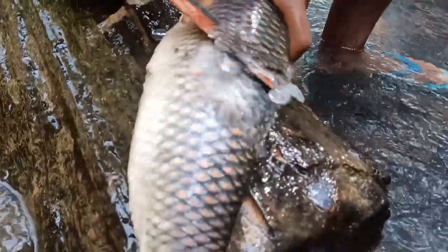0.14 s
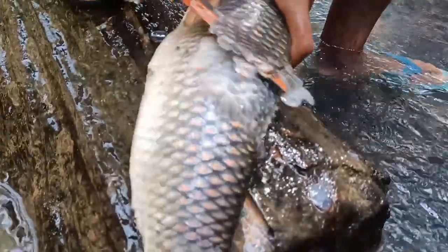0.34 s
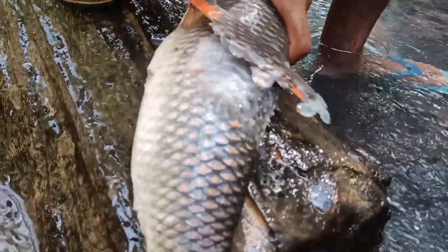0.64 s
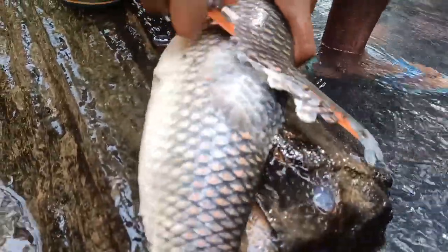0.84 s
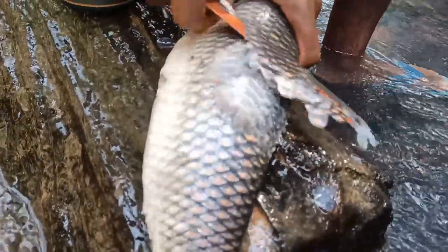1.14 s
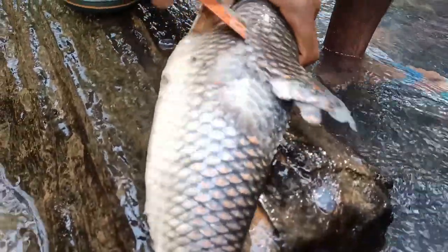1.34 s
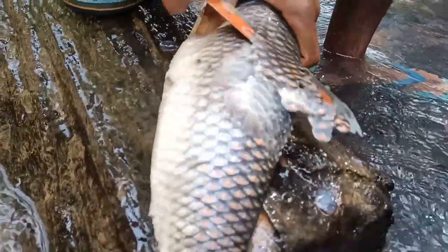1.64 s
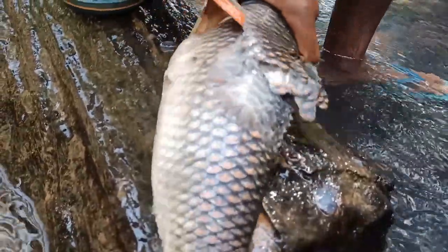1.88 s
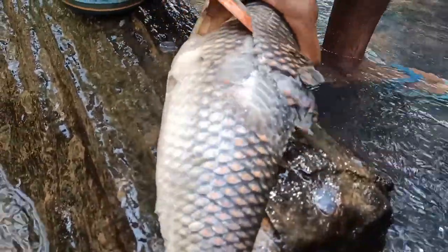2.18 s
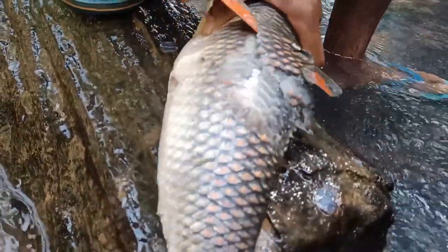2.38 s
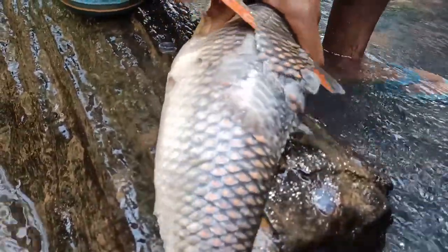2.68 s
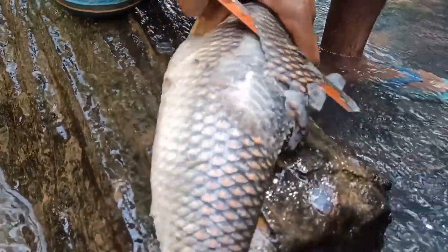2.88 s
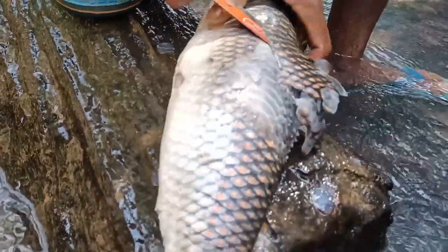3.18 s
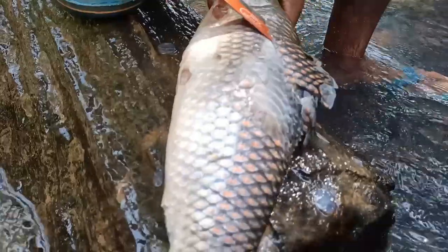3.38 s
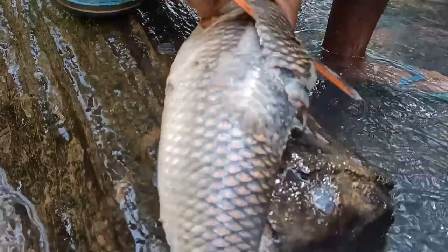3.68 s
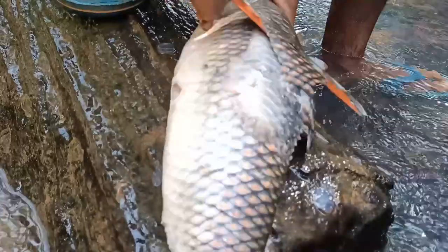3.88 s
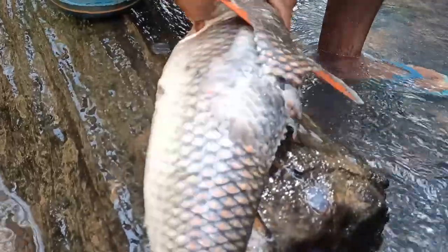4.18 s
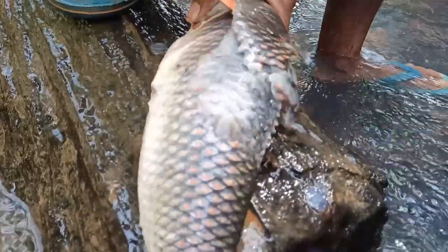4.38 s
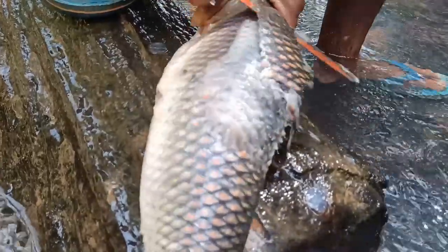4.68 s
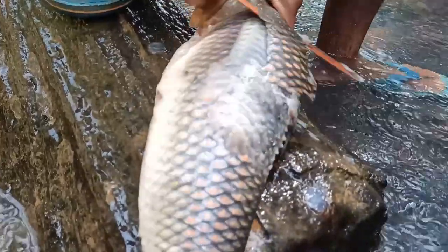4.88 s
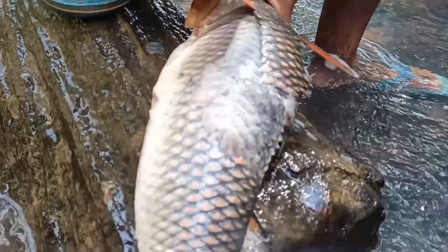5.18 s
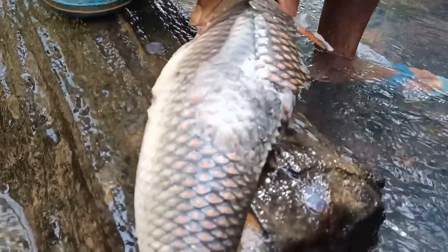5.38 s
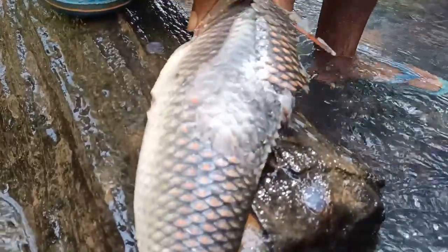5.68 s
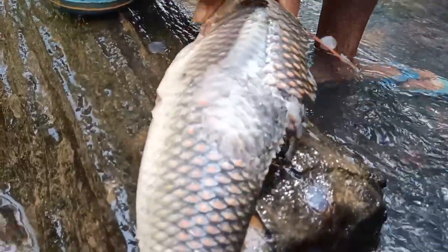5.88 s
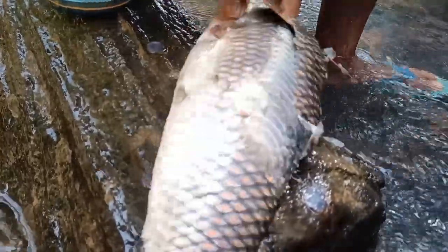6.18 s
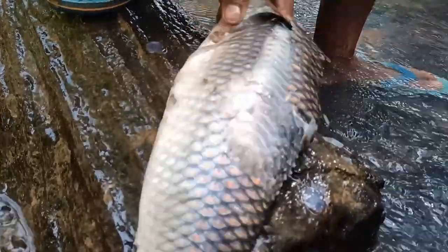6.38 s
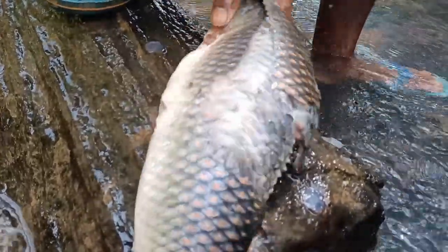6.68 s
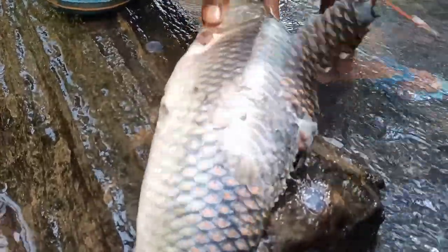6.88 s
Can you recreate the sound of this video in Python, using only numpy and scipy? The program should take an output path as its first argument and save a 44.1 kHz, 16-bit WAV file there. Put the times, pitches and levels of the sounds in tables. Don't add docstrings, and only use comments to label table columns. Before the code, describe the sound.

Very close, bright scraping: a blade saws beneath the scales of a big fish, strong push and softer return about three times a second. Sharp snaps pop out of the gritty rasp. After a short lull midway the strokes resume, weaker, swell again, then die away to a last tick. A shallow stream murmurs faintly outdoors, with a distant frog and a faint cricket.

```python
import sys
import numpy as np
from scipy import signal
from scipy.fft import rfft, irfft, next_fast_len
from scipy.io import wavfile
from scipy.ndimage import uniform_filter1d, map_coordinates

SR = 44100
rng = np.random.default_rng(int(sys.argv[2]) if len(sys.argv) > 2 else 0)


def voltage_ratio(decibels):
    exponent = np.asarray(decibels, float) / 20
    return 10 ** exponent


def materialize(psi):
    bounded = np.clip(np.atleast_2d(psi).T, -1, 1)
    quanta = np.round(bounded * 32767).astype(np.int16)
    wavfile.write(sys.argv[1], SR, quanta)


N = 310464

# [t/s, length/s, peak level/dB, peak place 0-1, blade slant/dB (flat is duller)]
PUSHES = [(0.205, 0.1, -20.5, 0.51, 5), (.504, 0.087, -24.5, 0.76, -4), (0.804, 0.09, -21, 0.22, -2.5),
          (1.099, 0.097, -22, 0.68, -1.5), (1.389, 0.1, -23.5, 0.39, 2.5), (1.684, 0.096, -21, 0.33, -1.5),
          (1.973, 0.1, -23, 0.41, 7.5), (2.264, 0.095, -22, 0.47, 0.5), (2.548, 0.1, -19.5, 0.51, 1.5),
          (2.839, 0.099, -29, 0.45, 4.5), (3.54, 0.13, -35, 0.38, 14.5), (3.873, 0.076, -32.5, 0.31, 10),
          (4.155, 0.092, -30.5, 0.25, -0.5), (4.448, 0.11, -22.5, 0.69, -3),
          (4.596, 0.075, -20.5, 0.61, -8), (4.87, 0.093, -24.5, 0.57, -8.5), (5.165, 0.11, -30, 0.22, -5.5),
          (5.467, 0.11, -28, 0.54, -7), (5.782, 0.098, -31.5, 0.63, -1), (6.121, 0.085, -39, 0.81, 12)]
# [t/s, length/s, peak level/dB, peak place 0-1, blade slant/dB]
PULLS = [(0.037, 0.12, -31, 0.6, -10.5), (0.324, 0.13, -32.5, 0.76, -5.5), (0.642, 0.11, -29.5, 0.76, 3.5),
         (0.921, 0.12, -27, 0.74, 3), (1.224, 0.12, -27, 0.81, -0.5), (1.518, 0.12, -28.5, 0.74, 0),
         (1.799, 0.12, -30, 0.77, -4.5), (2.087, 0.13, -31.5, 0.61, -1), (2.364, 0.14, -36, 0.77, -2),
         (2.668, 0.13, -27.0, 0.79, -6.5), (2.976, 0.1, -27.5, 0.84, -5.5), (3.693, 0.13, -35, 0.78, 0.5),
         (3.969, 0.13, -37.5, 0.77, -3), (4.276, 0.13, -37, 0.45, -5), (4.697, 0.12, -29, 0.71, -10),
         (4.98, 0.14, -33.5, 0.75, -7), (5.282, 0.15, -34, 0.71, -2), (5.622, 0.12, -37, 0.51, 0),
         (5.9, 0.13, -35, 0.5, -1), (6.215, 0.15, -37, 0.5, 1), (6.381, 0.18, -45.5, 0.6, 2.5)]
# [t/s, length/s, peak level/dB, peak place 0-1, blade slant/dB]
TOUCHES = [
    (0.0, 0.018, -26, 0.25, -3),
    (3.1, 0.039, -42.5, 0.11, -19),
    (3.15, 0.087, -42, 0.23, -1),
    (3.402, 0.088, -53, 0.62, 8),
    (6.585, 0.145, -54, 0.41, -17),
    (6.668, 0.024, -37, 0.33, 12),
    (6.75, 0.2, -65, 0.81, 23),
]
# [rise/dB, rise exponent, fall/dB, fall exponent]
SWELLS = [
    (16.2, 1.51, 10, 1.5),
    (25.2, 2.1, 10, 1.53),
    (7.94, 0.24, 10.5, 0.59),
]
# [thump/dB, skin drag/dB, bite/dB, rasp/dB, sizzle/dB]
COLOURS = [
    (-42.5, -25.5, -22, -2.5, -10.5),
    (-43.5, -27, -20, 3, -10),
    (-28.5, -20, -16, 5.5, -9),
]
LEADS = (0.012, 0.0052, .01)
PER_SLANT = (0.6, 0.7, 0.8, 0.8, 0.4)
OVER_BELLY = (13, -5.5, 11, -5, 5.5)
DRY_SCALES = (4, -1.5, -0.9, 3.6, 7.5)
# [t/s, over the belly 0-1, scale stiffness (under 0 is bare wet skin), extra scatter]
CUT = [(0.0, 0.68, 0, 0.7), (0.9, 0.68, 0.5, 0), (1.7, 0.66, -0.34, 0), (2.5, 0.59, -0.22, 0.76),
       (3.2, 0.67, -0.36, 0.65), (3.599, 0, 0.1, 0.95), (4.0, 0.48, 0.15, 0.55), (4.25, 0.23, -1.3, 0.57),
       (4.651, 0.49, -0.5, 0.15), (5.4, 0.46, -0.1, 0.88), (5.9, 0.54, 0.55, 0.3), (6.3, 0.6, 1.58, 0.88),
       (6.679, 0.54, 0.8, 0.7), (6.831, 0.9, -7.5, 0.5)]
# [f/Hz, level/dB]
USUAL_GRIP = [(600, -35), (1300, -30), (2200, -12), (3200, -12), (4100, -8), (5000, -8), (6500, 0),
              (11000, -6)]
# [f/Hz, density/dB per Hz]
SCALES = [(59, -51), (100, -31.5), (467, -28.5), (589, -22.5), (742, -28), (917, -24.5), (1340, -20.5),
          (1690, -21), (2930, -4), (3930, -6), (6530, -5), (9740, -5.5), (11100, -4.5), (14500, -11),
          (15500, -5)]
# [f/Hz, width/Hz, level/dB]
BELLY = (592, 120, 5.6)
# [f/Hz, level/dB added left and taken right]
PORTS = [(300, -2.5), (1200, 1), (2500, -0.25), (12000, 0.018)]
# [t/s, peak level/dB, fade/s]
CATCHES = [(0.0483, -26, 0.012), (0.0752, -9, 0.0098), (0.2174, -6.5, 0.013), (0.2404, -27, 0.012),
           (0.3451, -29, 0.012), (0.5551, -19, 0.012), (0.5866, -5.5, 0.011), (0.6559, -25, 0.013),
           (0.7188, -13, 0.01), (0.8106, -22, 0.012), (0.8255, -7, 0.01), (0.9303, -27, 0.012),
           (1.1039, -32, 0.011), (1.2406, -25, 0.013), (1.4007, -17, 0.012), (1.4192, -11, 0.012),
           (1.6975, -23, 0.012), (1.7114, -4, 0.025), (1.8352, -30, 0.013), (1.9844, -30, 0.012),
           (2.2623, -23, 0.012), (2.2892, -7, 0.012), (2.4119, -24, 0.01), (2.5591, -12, 0.012),
           (2.5714, -18, 0.012), (2.7157, -33, 0.012), (2.8684, -6.5, 0.025), (3.0165, -13, 0.011),
           (3.5613, -22, 0.013), (3.8811, -32, 0.012), (3.9923, -18, 0.013), (4.0597, -26, 0.012),
           (4.1699, -14, 0.016), (4.3124, -28, 0.011), (4.4503, -13, 0.014), (4.5121, -3.5, 0.011),
           (4.6074, -3.5, 0.013), (4.7451, -11, 0.016), (4.8788, -22, 0.012), (5.0135, -23, 0.0089),
           (5.1866, -28, 0.011), (5.4979, -18, 0.012), (5.6401, -19, 0.012), (5.8064, -29, 0.012),
           (6.1474, -25, 0.021), (6.2372, -24, 0.012), (6.2811, -22, 0.01), (6.3051, -8, 0.01),
           (6.6762, -20.5, 0.012)]
# [f/Hz, left lag upright/rad, leaning/rad, turned/rad, shading of scatter/dB]
POSES = [(0, 0, 0, 0, -3), (1200, 1.2, .5, .4, -3), (1900, 2.2, 1.3, 2.2, 0), (2900, 1.6, .6, 3.1, 0),
         (3800, 3.3, 2.5, 5.6, -12), (5300, 4.6, 3.4, 9.4, -1), (6800, 7.1, 6.3, 12.8, 0),
         (8500, 9.3, 7.2, 14, 0), (11700, 10.6, 7.9, 14.4, -1), (22050, 16, 13, 19, 0)]
# [t/s, pose 0-2]
TURNING = [(0, 0), (.8, 0), (1.5, 1), (3.8, 1), (3.81, 2), (5.2, 2), (5.21, 1), (6, .9), (6.2, 1.1)]
# [t/s, left-right level/dB, left lag of a snap/samples]
PLACE = [(0, -3, 7), (1, -1.5, 6.23), (3, -1, 3.7), (3.1, -2, 3.1), (3.6, 1, 1.6), (3.7, 0, 10.2),
         (4.3, 1.5, 13.4), (4.6, -1, 9.7), (5, 0.5, 10), (5.25, 0, 19), (5.3, -1.5, 3.9), (5.6, -2.5, 7.1),
         (6.2, 0, 3.2), (6.3, -0.5, 6.3), (7.04, 0, 5.3)]
# [t/s, level/dB, left-right level/dB, ring f/Hz]
CRACKS = [(.0766, -14.5, -4, 5940), (.219, -10, -4, 7920), (.5879, -11.5, -1, 4480),
          (.7202, -15.5, -5, 5340), (.8801, -13, -6, 10680), (1.2832, -15.5, -3, 8790),
          (1.8362, -21.5, 3, 5080), (1.9859, -18.5, -7, 6720), (2.0648, -15, -4, 6550),
          (2.3118, -8, -4, 5430), (2.4129, -20, -4, 4910), (2.5765, -9, -4, 5770),
          (3.0799, -22.5, -7, 6030), (3.0983, -12.5, 3, 7800), (3.7197, -21.5, 7, 4740),
          (.2913, -11.5, -3, 3880), (1.4205, -12, -7, 5600), (2.2902, -10.5, -5, 5770),
          (4.171, -14.5, 1, 5770), (4.5149, -8.5, 5, 5940), (4.6085, -8, -3, 8440), (5.0146, -17, 4, 5600),
          (5.0785, -15.5, -1, 5430), (6.3066, -14.5, 0, 6770), (6.6776, -21, 2, 7400),
          (4.0613, -23, 2, 4400), (.5615, -14, -4, 7200), (.2413, -9, -4, 6500)]
# [t/s, level/dB, left-right level/dB, ring f/Hz]
TICKS = [(.0268, -33, 4, 5770), (.0496, -27, -2, 6980), (.1839, -32, -9, 5250), (.6276, -25, -4, 4480),
         (.6573, -27, -6, 6720), (.7948, -28, -4, 8870), (1.2419, -25, 2, 4820), (1.7987, -28.5, -5, 4130),
         (2.1002, -33, -3, 5600), (2.6702, -31, -8, 6720), (3.1019, -26, -2, 8530), (3.2611, -32, 1, 5080),
         (.3375, -36, -4, 8000), (.3420, -35, -4, 7000), (3.998, -28, 4, 4700), (3.9511, -28, 6, 4390),
         (4.1557, -25, 2, 5600), (4.4153, -38.5, -1, 6030), (4.9767, -26, 10, 5680),
         (4.9922, -32.5, -7, 11800), (4.9981, -30.5, 3, 5340), (5.4375, -32.5, -1, 4390),
         (5.6204, -41.5, -1, 6890), (6.168, -27.5, -1, 11630), (6.4935, -33, -4, 8700),
         (6.6013, -46, -8, 11370), (6.6312, -42, -9, 8870)]
# [t/s, level/dB, left-right level/dB, ring f/Hz]
SLAPS = [
    (1.5349, -29, 0, 3620),
    (3.7947, -15, -2, 5000),
    (3.8046, -14.5, 9, 4910),
    (3.9936, -22, 5, 4700),
    (4.2485, -19, 2, 4740),
    (4.5908, -18, 6, 5250),
    (4.596, -17, 0, 5680),
    (6.0837, -37, 0, 5000),
    (6.6774, -24, 1, 4660),
]
KNOCKS = (-49.5, -39, -13.5)
# [t/s, rise/s, level/dB]
LIFT_OFF = (6.845, 0.022, -64)
# [f/Hz, width/Hz, level/dB]
LIFT_BANDS = [(4250, 500, 0), (5000, 900, -5), (5850, 700, -2), (7300, 400, -12)]
# [f/Hz, T60/s]
ROCKS = [(500, 0.017), (3000, 0.12), (12000, 0.0039)]
# [t/s, blade resting on skin level/dB, stream level/dB]
REST = [(0.0, -39.5, -70.5), (2.92, -41, -70.5), (3.369, -53, -73), (3.92, -37.5, -71), (4.88, -39, -71),
        (6.821, -53.5, -74), (7.04, -51, -71)]
# [f/Hz, density/dB per Hz]
STREAM = [(12, -43.5), (20, -10.5), (140, -13), (219, -16), (382, -14), (478, -15.5), (788, -19),
          (881, -23.5), (1010, -19.5), (1300, -24), (6360, -24.5), (7950, -51.5), (15500, -49.5)]
# [f/Hz, coherence 0-1]
COHERENCE = [(60, 0.018), (300, 0.53), (700, 0.16), (1500, 0.15)]
# [t/s, f/Hz, length/s, level/dB]
GURGLES = [(0.054, 1010, 0.025, -59), (0.587, 564, 0.021, -54.5), (1.715, 590, 0.018, -53.5),
           (1.875, 587, 0.056, -62), (2.151, 594, 0.048, -53), (3.467, 690, 0.0067, -61),
           (3.861, 666, 0.0266, -61.5), (3.998, 510, 0.041, -59), (4.247, 676, 0.0017, -42),
           (4.518, 38.2, 0.22, -67.5), (4.906, 50, 0.052, -74.5), (6.215, 1910, 0.03, -65),
           (6.677, 715, 0.0024, -46), (6.678, 261, 0.003, -47), (6.9, 1170, 0.023, -65)]
# [t/s, first f/Hz, last f/Hz, level/dB, hoarseness 0-1]
FROG = [
    (0.605, 990, 1060, -56.5, 0.7),
    (0.57, 1250, 1100, -54, 0.8),
    (2.04, 990, 1060, -56, 0.77),
    (2.035, 1200, 1130, -55, 0.8),
    (3.278, 1010, 1080, -56, 0.31),
    (4.801, 1020, 1110, -55, 0),
    (6.164, 1000, 1060, -58.5, 0.5),
]
# [t/s, length/s, level/dB]
CROAK = [
    (0.004, 0.022, -13.5),
    (0.035, 0.028, -12),
    (0.077, 0.031, -9.5),
    (0.115, 0.031, -2.5),
    (.146, .048, -8.5),
    (0.195, 0.017, -16),
]
# [t/s, f/Hz, level/dB]
CRICKET = [(3.249, 7600, -68), (4.09, 8000, -64.5), (6.062, 8050, -65), (6.395, 8000, -60),
           (6.73, 8100, -66), (6.89, 7500, -81), (6.975, 8040, -67)]


def blade_contact():
    edge, left, right = (crackle(rate=3000, spread_db=5, turns=1.3, hiss=0.65, burst=0.3) for _ in range(3))
    return edge, np.array([left, right])


def crackle(rate, spread_db, turns, hiss, burst):
    at, pitch, luck, phase = rng.random((4, int(rate * N / SR)))[..., None]
    hz = 1500 + 15000 * pitch
    t = np.arange(48) / SR
    size = np.sqrt(hz) * voltage_ratio(-spread_db * np.log(luck + 1 / 20))
    rings = size * np.cos(2 * np.pi * (hz * t + phase)) * np.exp(-t * hz / turns)
    places = (at * N).astype(int) + np.arange(len(t))
    grains = np.bincount(places.ravel(), rings.ravel(), N + len(t))[:N]
    rows = (rng.random(N) < 70 / SR) * rng.random(N)
    rattle = signal.fftconvolve(rows, np.exp(-np.arange(900) / (0.0097 * SR)))[:N]
    clumps = (1 + burst * rattle) * voltage_ratio(1.3 * wobble(N, 300))
    depth_db = 4 * np.clip(np.arange(129) / 16, 0.3, 1)[:, None]
    friction = clumps * (unit(grains) + hiss * rng.standard_normal(N))
    return unit(patched(friction, depth_db, bins=2, frames=22))


def strokes(contact, scattered):
    out = np.zeros((2, N))
    usual_hz, usual_db = np.transpose(USUAL_GRIP)
    cut_s, *cut = np.transpose(CUT)
    tremble_db, caught = 0.13 * wobble(N, 700), catches()
    tail = 0.026
    kinds = zip([PUSHES, PULLS, TOUCHES], SWELLS, COLOURS, [-1, 1, 0], LEADS)
    for rows, shape, colour, lean, lead in kinds:
        for s, length, peak_db, peak_at, slant_db in rows:
            first = max(round((s - lead) * SR), 0)
            span = slice(first, round((s + length + tail) * SR))
            soft, dry, extra = (np.interp(s, cut_s, column) for column in cut)
            share = np.clip(0.37 * (1 + extra + lean * 0.17), 0.05, 0.8)
            change_db = np.dot([slant_db, soft, dry], [PER_SLANT, OVER_BELLY, DRY_SCALES])
            thump, drag, bite, rasp, sizzle = np.array(colour) + change_db
            grip_db = np.array([thump, drag, bite, bite, rasp, rasp, 0, sizzle]) - usual_db
            grip = list(zip(usual_hz, grip_db))

            def response(hz):
                belly = BELLY[2] * np.exp(-((hz - BELLY[0]) / BELLY[1]) ** 2)
                return along(SCALES, hz) + along(grip, hz) + belly + along(PORTS, hz) * [[1], [-1]]

            rub = unit(coloured(at_ports(contact[span], scattered[:, span], share, s), response))
            t = (first + np.arange(rub.shape[1])) / SR - s
            corners = [-lead, 0, 0.069 * length, 0.93 * length, length, length + tail]
            edges_db = np.interp(t, corners, [-24.0, -5, 0.5, 0.0, -11.0, -43.5])
            level_db = peak_db + swell(t / length, peak_at, *shape) + edges_db + tremble_db[span]
            touching = (t > -lead) * (t < length + 0.01)
            power = voltage_ratio(2 * uniform_filter1d(level_db, size=60)) + caught[span] * touching
            add(out, first / SR, panned(rub * np.sqrt(power), hand(s, column=1)))
    return out


def swell(u, peak_at, rise_db, rise_curve, fall_db, fall_curve):
    peak_at = np.clip(peak_at, 0.05, 0.95)
    rise = np.clip(1 - u / peak_at, 0, 1)
    fall = np.clip((u - peak_at) / (1 - peak_at), 0, 1)
    return -rise_db * rise ** rise_curve - fall_db * fall ** fall_curve


def catches():
    power, t = np.zeros((1, N)), np.arange(SR // 10) / SR
    for s, db, fade in CATCHES:
        add(power, s, voltage_ratio(2 * (db - 17)) * np.exp(-2 * t / fade))
    return power[0]


def at_ports(edge, scattered, share, s):
    hz = np.fft.rfftfreq(len(edge), 1 / SR)
    at, *poses, shade_db = np.transpose(POSES)
    pose = np.clip(np.interp(s, *np.transpose(TURNING)) + rng.normal(0, 0.08), 0, 2)
    lag_rad = np.interp(hz, at, [np.interp(pose, [0, 1, 2], row) for row in np.transpose(poses)])
    loose = share * voltage_ratio(2 * np.interp(hz, at, shade_db))
    direct = rfft(edge) * np.exp(-1j * lag_rad * [[1], [0]])
    return irfft(np.sqrt(1 - loose) * direct + np.sqrt(loose) * rfft(scattered), len(edge))


def hand(s, column):
    place = np.transpose(PLACE)
    return np.interp(s, place[0], place[column])


def snaps():
    out, t = np.zeros((2, N)), np.arange(1200) / SR

    def burst(hz, rise):
        return t / rise * np.exp(1 - t / rise) * np.sin(2 * np.pi * hz * t)

    def scale_noise(noise, t60):
        return coloured(noise * voltage_ratio(-60 * t / t60), lambda hz: along(SCALES, hz))

    for rows, knock_db in zip([CRACKS, TICKS, SLAPS], KNOCKS):
        for s, db, pan_db, hz in rows:
            rattle = scale_noise(rng.standard_normal((2, len(t))), 0.016)
            edge = scale_noise(rng.standard_normal(len(t)), 0.002)
            crack = 0.8 * burst(hz, 0.0003) + 0.6 * np.roll(edge, 8) / np.abs(edge).max()
            centre = crack + voltage_ratio(knock_db) * burst(1860, 0.00044)
            lag = round(hand(s, column=2))
            pair = 0.42 * rattle / np.abs(rattle).max() + [np.roll(centre, lag), centre]
            add(out, s - 0.0005, panned(voltage_ratio(db) * pair, pan_db))
    return out


def lift_off(scattered):
    start, rise, db = LIFT_OFF

    def bands(hz):
        return 10 * np.log10(sum(voltage_ratio(2 * top) / (1 + (2 * (hz - c) / w) ** 2) ** 2 for c, w, top in LIFT_BANDS))

    onset = np.clip((np.arange(N) / SR - start) / rise, 0, 1)
    return unit(coloured(scattered[::-1], bands)) * voltage_ratio(db) * onset


def rocks(x):
    hz, t, z = signal.stft(rng.standard_normal((2, SR // 8)), SR, nperseg=128)
    tail = signal.istft(z * voltage_ratio(-60 * t / along(ROCKS, hz)[:, None]), SR, nperseg=128)[1]
    return signal.fftconvolve(x, tail / np.linalg.norm(tail[0]), axes=1)[:, :N]


def resting_blade(scattered):
    s, rest_db, _ = np.transpose(REST)
    whisper = 0.37 * scattered[:, ::-1] + rng.standard_normal((2, N))
    level_db = np.interp(np.arange(N) / SR, s, rest_db) - 19.5
    return unit(coloured(whisper, lambda hz: along(SCALES, hz))) * voltage_ratio(level_db)


def gurgles():
    out = np.zeros((2, N))
    for s, hz, length, db in GURGLES:
        add(out, s, panned(voltage_ratio(db) * blip(hz, length, rise=1.053), -1.5))
    return out


def stream():
    s, _, stream_db = np.transpose(REST)
    pair = patched(rng.standard_normal((2, N)), depth_db=2.5, bins=2, frames=16)
    hz = np.fft.rfftfreq(N, 1 / SR)
    turn = np.arccos(np.clip(along(COHERENCE, hz), -1, 1)) / 2
    mid, side = irfft(rfft(pair) * voltage_ratio(along(STREAM, hz)) * [np.cos(turn), np.sin(turn)], N)
    level_db = np.interp(np.arange(N) / SR, s, stream_db) + 4
    return unit(np.array([mid + side, mid - side])) * voltage_ratio(level_db)


def frog():
    out = np.zeros((2, N))
    for s, first_hz, last_hz, db, hoarse in FROG:
        for at, length, note_db in CROAK:
            hz = 1.04 * (first_hz + (last_hz - first_hz) * at / 0.2)
            note = blip(hz, length * (1 + hoarse * 0.5), rise=0.93)
            noise = np.array([wobble(len(note), 104), wobble(len(note), 104)])
            shake = (1 - hoarse / 2) + hoarse / 2 * noise
            add(out, s + at, panned(voltage_ratio(db + note_db * (1 - hoarse)) * note * shake, 4))
    return out


def cricket():
    out = np.zeros((2, N))
    for s, hz, db in CRICKET:
        for pulse in range(8):
            tone = blip(hz * (1 + 0.015 * rng.normal()), 0.0092, rise=0.99)
            add(out, s + pulse * 0.006, panned(voltage_ratio(db + rng.normal(-2.2, 1.7)) * tone, 2.2))
    return out


def blip(hz, length, rise):
    count = round(length * SR)
    phase = 2 * np.pi * np.cumsum(np.linspace(hz, hz * rise, count)) / SR
    return np.hanning(count) ** 0.5 * np.sin(phase)


def patched(x, depth_db, bins, frames):
    z = signal.stft(x, nperseg=256)[2]
    field = uniform_filter1d(uniform_filter1d(rng.standard_normal(z.shape[-2:]), bins, 0), frames, 1)
    return signal.istft(z * voltage_ratio(depth_db * unit(field)), nperseg=256)[1][..., :N]


def coloured(x, db_of):
    m = next_fast_len(x.shape[-1] + 4096)
    cep = irfft(np.log(np.maximum(voltage_ratio(db_of(np.fft.rfftfreq(m, 1 / SR))), 1e-6)), m)
    cep[..., 1:m // 2] *= 2
    cep[..., m // 2 + 1:] = 0
    return irfft(rfft(x, m) * np.exp(rfft(cep)), m)[..., :x.shape[-1]]


def along(points, hz):
    f, v = np.transpose(points)
    return np.interp(np.log(hz + 1), np.log(f + 1), v)


def wobble(count, step):
    return map_coordinates(rng.standard_normal(int(count / step) + 4), [np.arange(count) / step])


def unit(x):
    return x / np.sqrt(np.mean(x ** 2) + 1e-20)


def panned(x, pan_db):
    return x * voltage_ratio(np.array([[pan_db / 2], [-pan_db / 2]]))


def add(track, s, piece):
    seat = track[:, round(s * SR):][:, :piece.shape[-1]]
    seat += piece[..., :seat.shape[1]]


def scene():
    contact, scattered = blade_contact()
    fish = strokes(contact, scattered) + snaps() + lift_off(scattered)
    surroundings = resting_blade(scattered) + gurgles() + stream() + frog() + cricket()
    return fish + voltage_ratio(-17) * rocks(fish) + surroundings


def top_cut(x):
    return signal.sosfilt(signal.butter(12, 16480, fs=SR, output="sos"), x)


def record(dry):
    hz = np.fft.rfftfreq(N, 1 / SR)
    limited = irfft(rfft(dry) * voltage_ratio(-np.clip((hz - 15350) / 16, 0, 90)), N)
    return top_cut(limited)


dry = scene()
out = record(dry)
materialize(out)
```